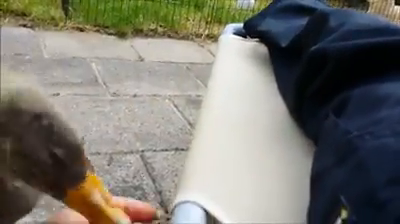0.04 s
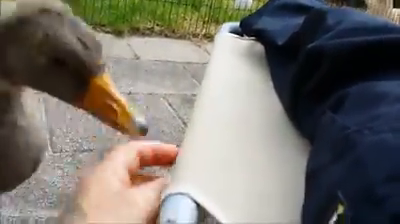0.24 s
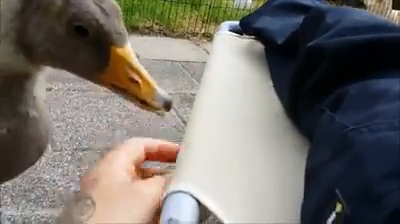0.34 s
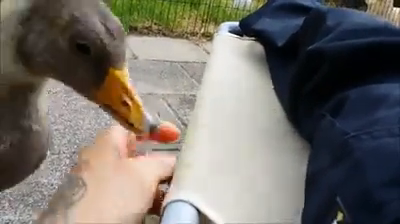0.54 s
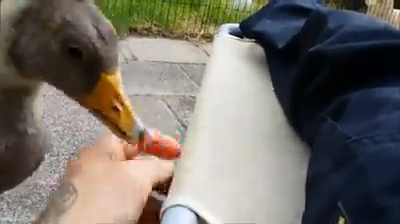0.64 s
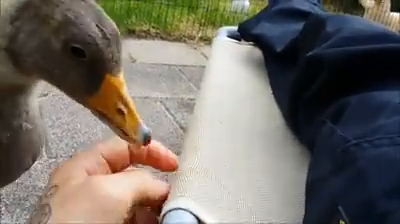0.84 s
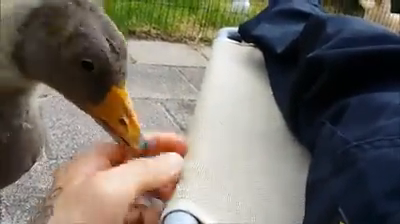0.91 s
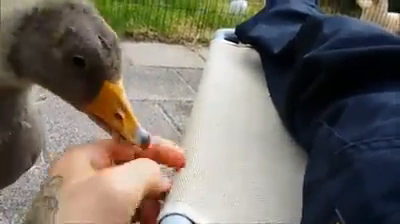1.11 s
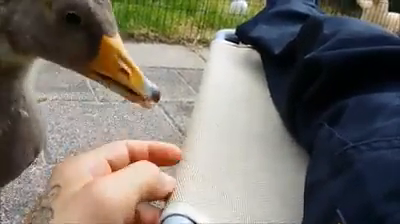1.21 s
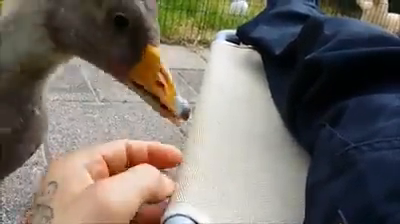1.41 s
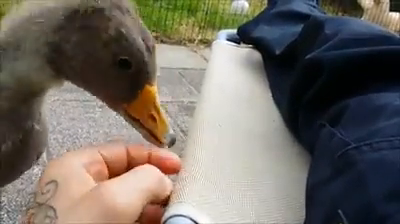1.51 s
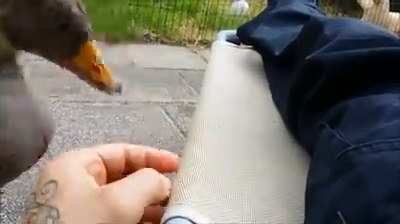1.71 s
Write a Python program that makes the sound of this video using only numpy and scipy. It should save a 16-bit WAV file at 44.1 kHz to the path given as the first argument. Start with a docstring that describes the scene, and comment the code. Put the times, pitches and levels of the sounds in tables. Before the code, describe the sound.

On a paved patio, a nearby goose calls about ten times in rapid succession, its short, squeaky honks turning hoarse and hissy in the middle. A low outdoor rumble and a very faint distant bird lie underneath.

```python
"""A paved patio: a goose close by gives a quick run of ten short, high calls.
Each is a whistled arch that starts clean, turns raspy and hissy as it climbs, and clears as it falls.
A second, slower oscillator in the throat shakes the tone and chops the hiss.
Paving and a chair reflect the calls; behind them are a low rumble, soft air and a faint far bird."""
import sys
import numpy as np
from scipy import signal
from scipy.fft import rfft, irfft
from scipy.io import wavfile

SR = 44100
rng = np.random.default_rng(int(sys.argv[2]) if len(sys.argv) > 2 else 0)


def wrap_up_sound(samples):
    """Save the sound to the file named by the first command line argument, as 16-bit audio."""
    columns = np.atleast_2d(samples).T
    # keep every value between -1 and 1, then stretch to whole-number steps
    tamed = np.clip(columns, -1, 1)
    steps = np.round(tamed * 32767).astype(np.int16)
    wavfile.write(sys.argv[1], SR, steps)


N = 77175
T, HZ = np.arange(N) / SR, np.fft.rfftfreq(N, 1 / SR)


def amp(db):
    """Decibels to gain."""
    return 10 ** (np.asarray(db) / 20)


def unit(x):
    """Scale to rms 1."""
    return x / np.sqrt(np.mean(x ** 2) + 1e-20)


def add(mix, start_s, sound):
    """Mix a sound in at start_s."""
    part = mix[max(round(start_s * SR), 0):][:len(sound)]
    part += sound[:len(part)]


def colour(x, table):
    """Filter by rows of freq_hz, then gain_db per channel."""
    freq_hz, *channels_db = np.transpose(table)
    gain_db = [np.interp(np.log(HZ + 1), np.log(freq_hz), db) for db in channels_db]
    return irfft(rfft(x) * amp(gain_db), N)


def envelope(table):
    """Gain curve from rows of time_s, gain_db."""
    return amp(np.interp(T, *np.transpose(table)))


def wander(cutoff_hz):
    """Low-passed random drift, rms 1."""
    return unit(irfft(rfft(rng.standard_normal(N)) / np.sqrt(1 + (HZ / cutoff_hz) ** 6), N))


def stereo_noise(correlation=0):
    """White noise, left and right."""
    a, b = rng.standard_normal((2, N))
    return np.array([a, correlation * a + np.sqrt(1 - correlation ** 2) * b])


def delay(x, delay_s):
    """Circular fractional delay."""
    return irfft(rfft(x) * np.exp(-2j * np.pi * HZ * delay_s), N)


def outdoor_rumble(split_hz=181, bass_db=0.5, right_db=3.5):
    """Low noise; bass and low mids swell separately."""
    spectrum = [(20, -18), (45, -10), (68, -0.5), (95, -2), (118, 5), (155, -4.5), (200, -2), (270, 0.5),
                (380, -5.5), (520, -16), (900, -30), (2000, -47)]  # freq_hz, gain_db
    bass_swell = [(0.0, -61), (0.296, -59), (0.306, -55.5), (1.36, -56.5), (1.402, -48.5), (1.49, -68),
                  (1.544, -55.5), (1.75, -63.5)]  # time_s, gain_db
    low_mid_swell = [(0.0, -64), (0.384, -54.5), (0.696, -58), (0.716, -54), (0.9, -58.5), (0.934, -48.5),
                     (1.134, -55.5), (1.184, -50.5), (1.652, -53.5), (1.706, -63.5), (1.75, -57.5)]  # time_s, gain_db
    rumble = colour(stereo_noise(correlation=0.93), spectrum) * amp([[0], [right_db]])
    bass = irfft(rfft(rumble) / (1 + (HZ / split_hz) ** 10), N)
    low_mid = rumble - bass
    return amp(bass_db) * envelope(bass_swell) * unit(bass) + envelope(low_mid_swell) * unit(low_mid)


def outdoor_air(base_db=-56.5):
    """Soft broadband noise with one slow swell."""
    spectrum = [(293, -5.5, -3), (815, 0.5, 6), (1200, 0, 3.5), (1700, -2.5, 6), (2140, 1, 8.5),
                (2780, 0.5, 1), (3600, 1, -4), (4500, -1, -2), (5800, 0.5, -3.5), (6730, 4.5, -7),
                (7800, -4.5, -5), (8870, -5, -0.5), (10300, -10.5, -9)]  # freq_hz, left_db, right_db
    swell = [(0, -3), (.3, 0.5), (.65, 2.5), (1.0, 2.5), (1.35, 4.5), (1.55, -0.5), (1.75, -4.5)]  # time_s, gain_db
    return amp(base_db) * envelope(swell) * unit(colour(stereo_noise(), spectrum))


def far_bird(centre_hz=4550, half_width_hz=610):
    """Faint high chirps, blurred by distance to a band of noise."""
    chirps = [(0.016, 0.091, -58.5), (0.614, .1, -54.5), (1.319, 0.083, -52)]  # start_s, length_s, level_db
    level = np.zeros(N)
    for start_s, length_s, level_db in chirps:
        t = np.arange(0, length_s, 1 / SR)
        add(level, start_s, amp(level_db) * np.sin(np.pi * t / length_s))
    band = irfft(rfft(stereo_noise()) / (1 + ((HZ - centre_hz) / half_width_hz) ** 4), N)
    return level * unit(band)


def patio(x, tail_db=-24, t60_s=0.17, build_s=0.0071):
    """Direct sound, near reflections off paving and chair, and the yard's diffuse tail."""
    echoes = [(.0031, -22.5, -21), (.0058, -17.5, -19.5), (0.0119, -14, -19.5)]  # delay_s, left_db, right_db
    near = sum(amp([[left_db], [right_db]]) * delay(x, delay_s) for delay_s, left_db, right_db in echoes)
    tail = rng.standard_normal((2, N)) * amp(-60 * T / t60_s) * np.minimum(T / build_s, 1)
    tail /= np.linalg.norm(tail[0])
    return x + near + amp(tail_db) * signal.fftconvolve(x, tail, axes=1)[:, :N]


def goose_gestures(base_hz=1265, release_s=0.0048, hiss_range_db=21, rasp_hold=0.913):
    """Control curves of the calls; strain drives rasp and hiss."""
    # start_s, length_s, level_db, top_hz, roughness, hiss_db, fall_db, attack_s, squeak_db, pace
    calls = [ (0.22, 0.055, -3.5, 1950, .4, -0.5, -2, 0.02, -28, 0.99),
             (.310, 0.078, -4, 2178, 0.38, 0.5, 1, 0.0055, -20.5, 0.99),
             (0.421, 0.084, -1.5, 2245, .42, 0.5, 1.5, .005, -14.5, 0.97),
             (0.552, .088, -2, 2211, 0.7, .5, 3, .004, -16, 0.94),
             (0.702, 0.086, -0.86, 2335, .95, 3, 0, 0.0055, -10.5, 0.99),
             (.845, 0.087, -3.5, 2291, 0.77, -2, 3.5, 0.0048, -12, 0.96),
             (1.007, .089, 1.5, 2377, .75, -3.5, -1.5, 0.0072, -21, 1.0),
             (1.136, .084, -2, 2333, 0.89, -0.5, 3, 0.0031, -13, 0.95),
             (1.246, 0.085, 0.1, 2418, 0.64, -7, 1, 0.0032, -16.5, 1),
             (1.378, 0.088, 0.13, 2430, 0.74, -3.5, 0.5, 0.0045, -15.5, 0.9)]
    # arch of every call: length_fraction, lift_fraction, level_db, strain_fraction
    arch = [(0, 0, -8.5, 0.17), (.08, 0.01, 1.5, 0.12), (.15, 0.15, 1.5, 0.42), (.22, .35, 0.4, 0.25),
            (.31, .55, -1, 0.81), (0.411, .86, -2.5, 0.91), (.55, 1, -10, 0.65), (0.688, .95, -8.5, 0.13),
            (.8, .72, -8.5, 0.61), (.88, .33, -3.5, 0.32), (1, 0, -6.5, 0.1)]
    catch_s, catch_width_s, catch_db = 0.009, 0.0012, -4  # voice catches just after the onset
    squeak_s, squeak_width_s = 0.0061, 0.003  # opening flash of the octave
    knots, *curves = np.transpose(arch)
    rise_hz, loudness, rasp, hiss, squeak = np.zeros((5, N))
    for start_s, length_s, level_db, top_hz, roughness, hiss_db, fall_db, attack_s, squeak_db, pace in calls:
        t = np.arange(0, length_s, 1 / SR)
        progress = (t / length_s) ** pace  # pace < 1 rises early
        lift, arch_db, strain = (np.interp(progress, knots, curve) for curve in curves)
        gate = np.sin(np.pi / 2 * np.minimum(t / attack_s, 1)) ** 2
        gate *= np.minimum((length_s - t) / release_s, 1)
        dip_db = catch_db * np.exp(-((t - catch_s) / catch_width_s) ** 2)
        tilt_db = fall_db * np.sin(np.pi * progress / 2) ** 2  # weights the falling half
        add(rise_hz, start_s, (top_hz - base_hz) * lift)
        add(loudness, start_s, gate * amp(level_db + arch_db + dip_db + tilt_db))
        add(rasp, start_s, roughness * np.maximum(strain, rasp_hold * lift))  # stays rough while high
        add(hiss, start_s, gate * amp(level_db + hiss_db + hiss_range_db * (strain - 1)))
        add(squeak, start_s, amp(squeak_db) * np.exp(-((t - squeak_s) / squeak_width_s) ** 2))
    return base_hz + rise_hz, loudness, rasp, hiss, squeak


def goose(voice_db=-20, hiss_db=-38, buzz_db=-6.5, right_lag_s=0.0003733):
    """Whistled tone, shaken by a slower throat oscillator that also chops the hiss."""
    overtones = [(2, -23.5), (3, -28)]  # harmonic, gain_db
    voice_response = [(900, -33, -19), (1092, -10.5, -9), (1210, -6.5, -0.5), (1513, -9, -0.5),
                      (1630, -8.5, 3.5), (1900, -8.5, 1), (2270, -13.5, -1.5), (2620, -7, -6.5),
                      (3040, -10.5, -14.5), (3630, -2.5, -4), (4660, -8, -11), (5730, 9.5, 2),
                      (6400, -0.5, -16), (7850, -7, 4)]  # freq_hz, left_db, right_db
    hiss_spectrum = [(200, -11, -7), (555, -4.5, -4.5), (830, 6.5, 4), (1080, 0, -3.5), (1400, 0, -1),
                     (2090, 8.5, -9), (3070, 0, -4.5), (3560, 3, -1), (4300, 1, -2), (5160, -10.5, -10.5),
                     (5300, -0.5, -0.5), (5680, 8, 2), (6000, 0.5, -3.5), (6680, 1, -12), (7060, -4.5, -9),
                     (7820, -4, 7), (8500, -12.5, -2), (9340, -15.5, 3), (10500, -28, -17)]  # freq_hz, left_db, right_db
    flutter_hz, flutter_drift, flutter_depth = 359.5, 0.24, 0.61
    bend_rad, lead_rad = 0.7, 0.22  # bend leads the tremor: favours the lower sideband
    jitter_depth, jitter_hz, shimmer_depth, shimmer_hz = 0.0793, 380, 0.47, 170
    crackle_db, crackle_hz = 2.5, 218
    pitch_hz, loudness, rasp, hiss, squeak = goose_gestures()

    flutter = 2 * np.pi * np.cumsum(flutter_hz * (1 + flutter_drift * wander(jitter_hz))) / SR
    phase = 2 * np.pi * np.cumsum(pitch_hz * (1 + jitter_depth * rasp * wander(jitter_hz))) / SR
    phase += bend_rad * rasp * np.sin(flutter + lead_rad)
    tremor = 1 + flutter_depth * rasp * np.sin(flutter)
    shimmer = 1 + shimmer_depth * np.sqrt(rasp) * wander(shimmer_hz)
    shake_rms = np.sqrt((1 + (flutter_depth * rasp) ** 2 / 2) * (1 + shimmer_depth ** 2 * rasp))
    shake = tremor * shimmer / shake_rms
    harmonics = sum(amp(db) * np.sin(round(k) * phase) for k, db in overtones)
    tone = np.sin(phase) + squeak * np.sin(2 * phase) + np.sqrt(rasp) * harmonics
    voice = amp(voice_db) * colour(loudness * shake * tone * np.sqrt(2), voice_response)

    breath = (1 + np.sin(phase)) * stereo_noise(correlation=0.16)
    reedy_buzz = amp(buzz_db) * sum(np.sin(k * phase) for k in range(2, 6))
    crackle = amp(crackle_db * wander(crackle_hz))
    puffs = hiss * tremor * crackle * (breath + reedy_buzz)
    left, right = voice + amp(hiss_db) * colour(puffs, hiss_spectrum)
    return np.array([left, delay(right, right_lag_s)])


def scene():
    """Goose on the patio, outdoors behind."""
    return patio(goose()) + outdoor_rumble() + outdoor_air() + far_bird()


def record(dry):
    """Low-pass band limit."""
    cutoff_hz = 10450
    lowpass = signal.firwin(401, cutoff_hz, window=("kaiser", 8), fs=SR)
    return signal.oaconvolve(dry, lowpass[None], "same")


dry = scene()
out = record(dry)
wrap_up_sound(out)
```